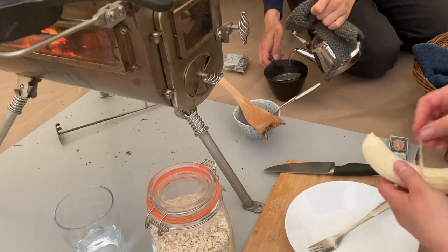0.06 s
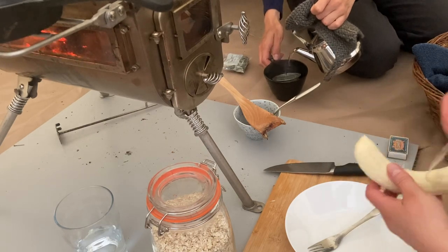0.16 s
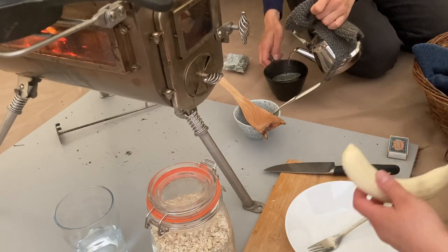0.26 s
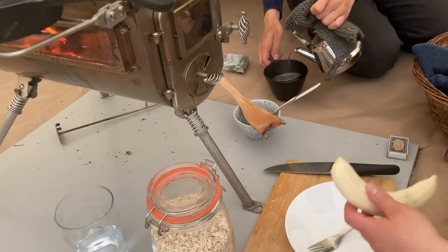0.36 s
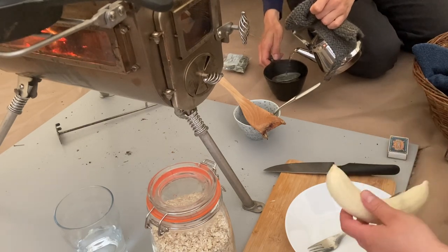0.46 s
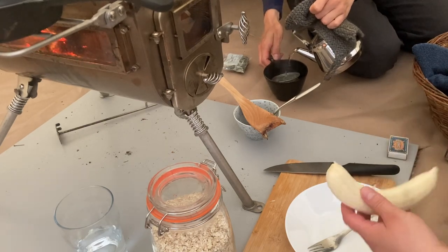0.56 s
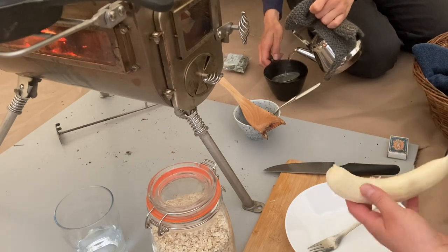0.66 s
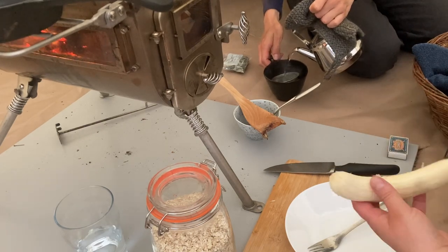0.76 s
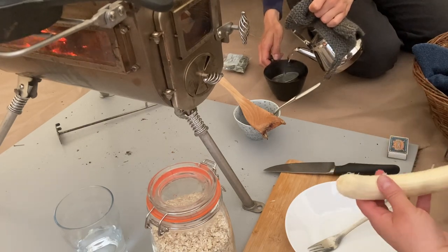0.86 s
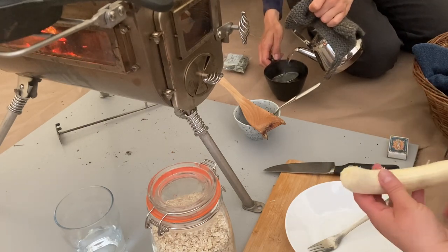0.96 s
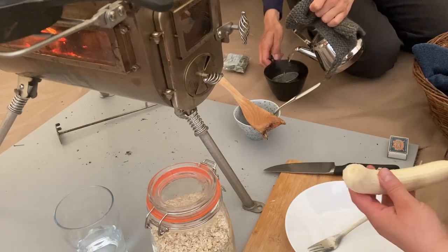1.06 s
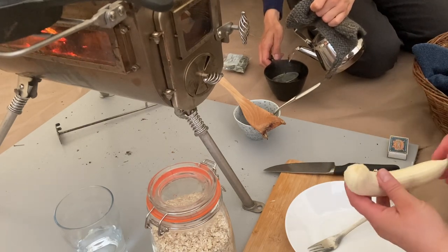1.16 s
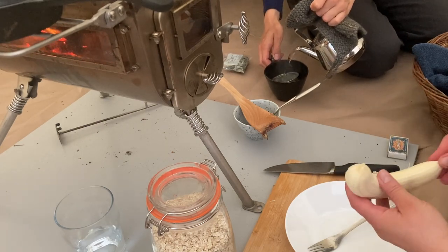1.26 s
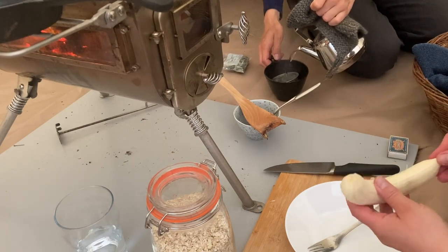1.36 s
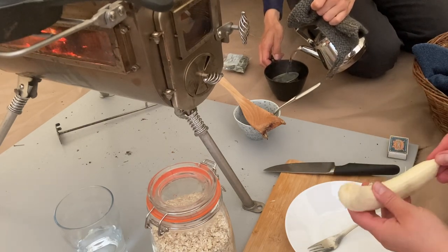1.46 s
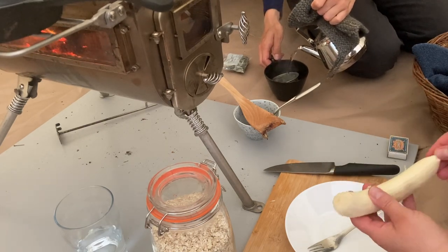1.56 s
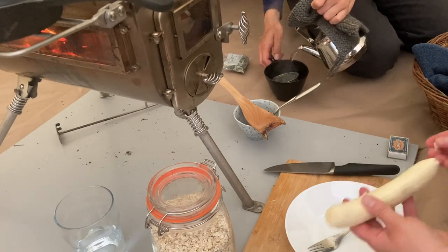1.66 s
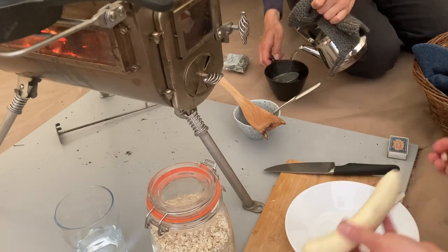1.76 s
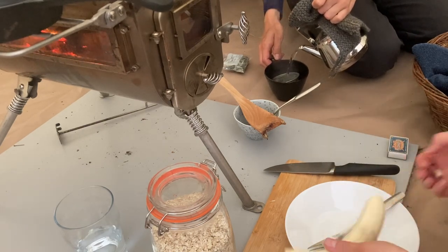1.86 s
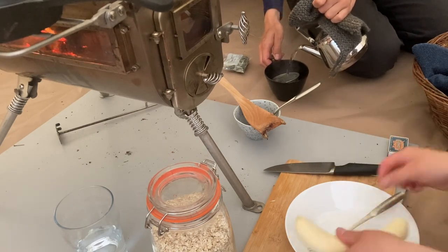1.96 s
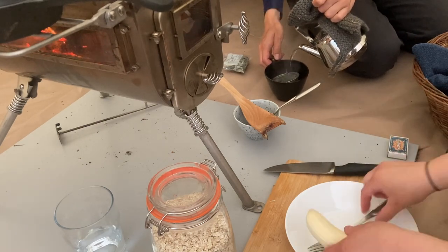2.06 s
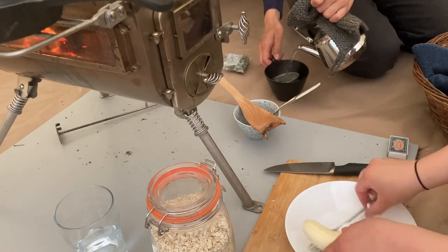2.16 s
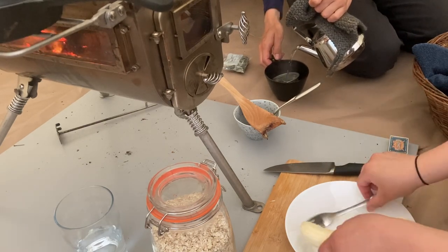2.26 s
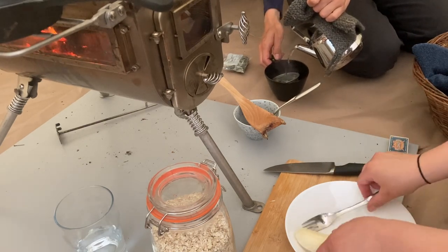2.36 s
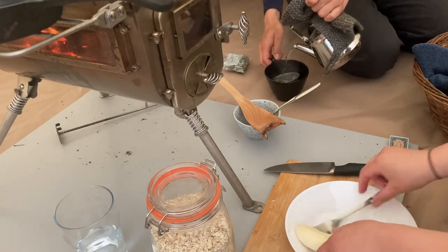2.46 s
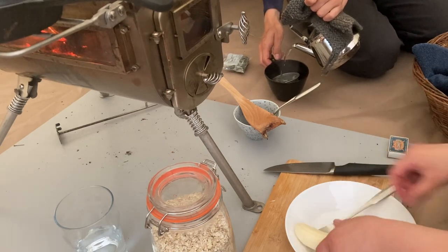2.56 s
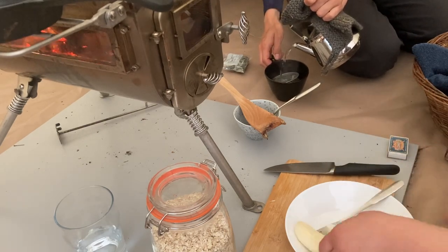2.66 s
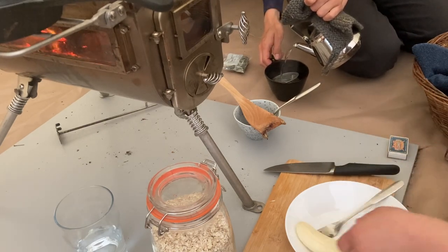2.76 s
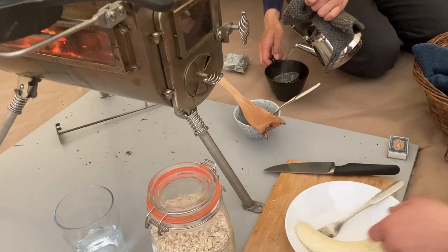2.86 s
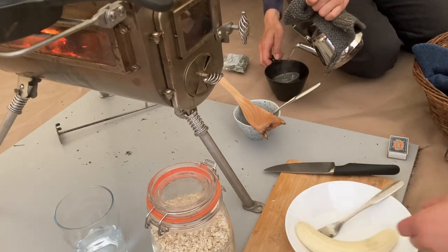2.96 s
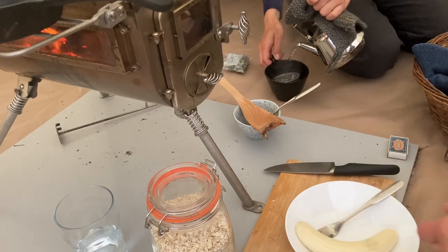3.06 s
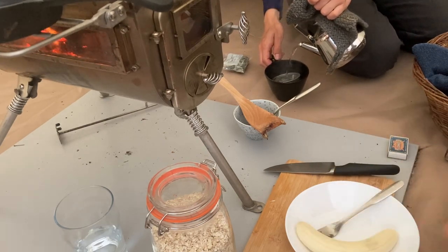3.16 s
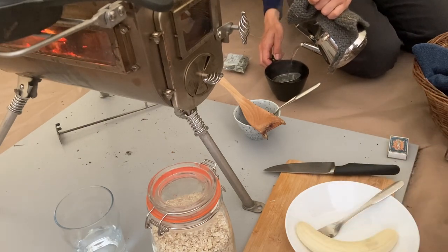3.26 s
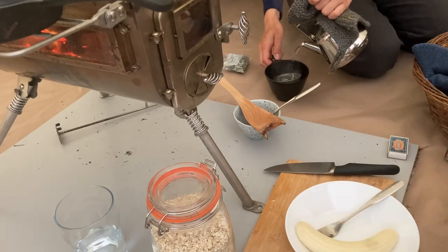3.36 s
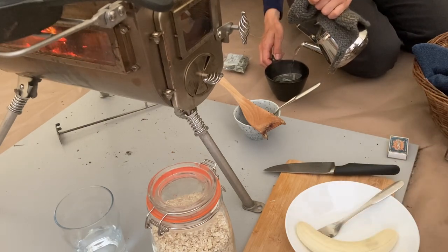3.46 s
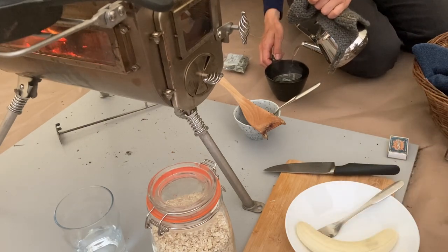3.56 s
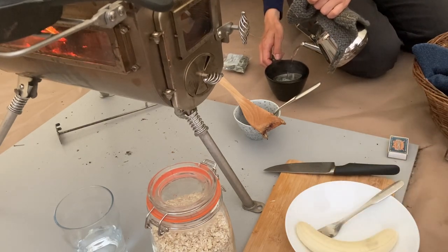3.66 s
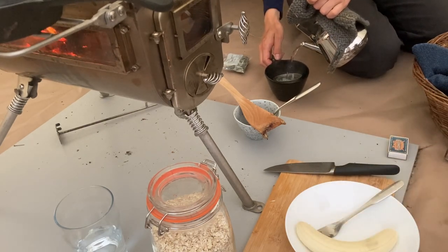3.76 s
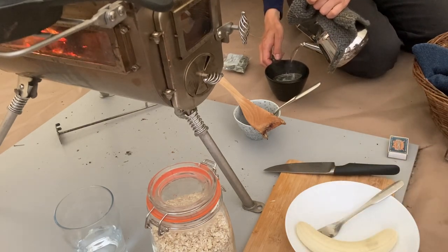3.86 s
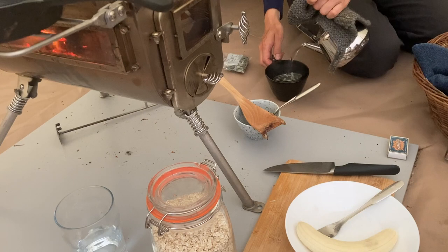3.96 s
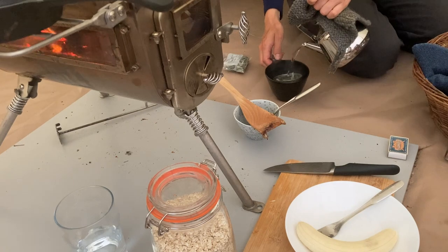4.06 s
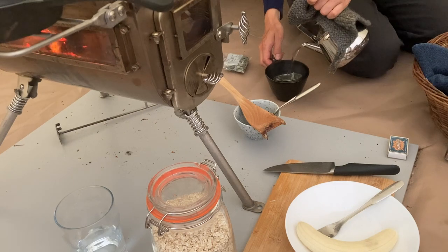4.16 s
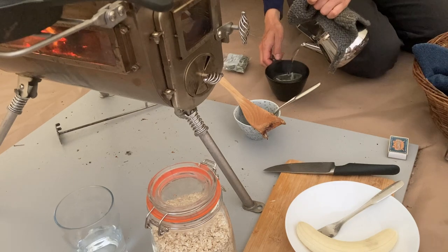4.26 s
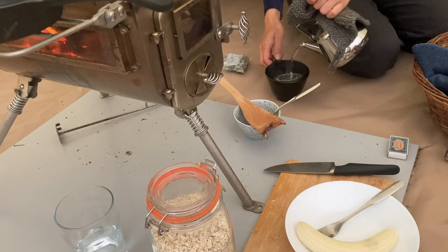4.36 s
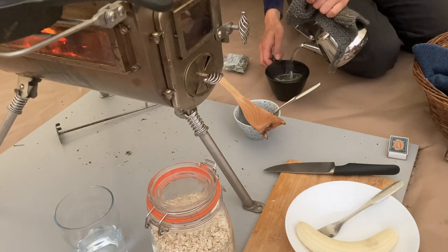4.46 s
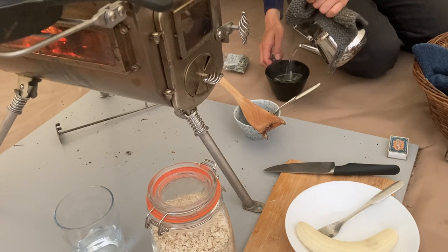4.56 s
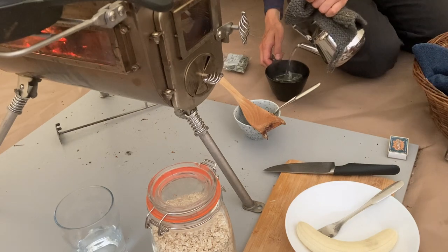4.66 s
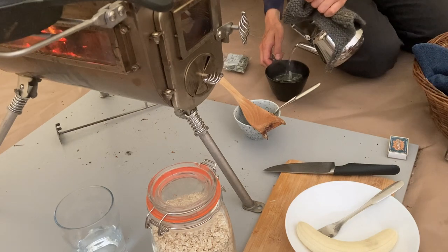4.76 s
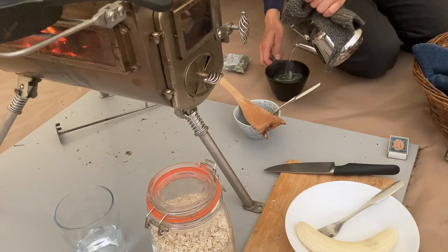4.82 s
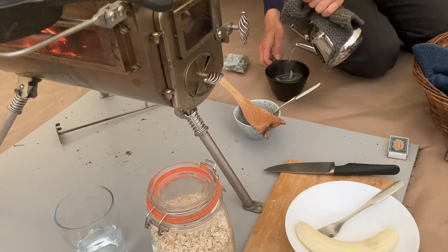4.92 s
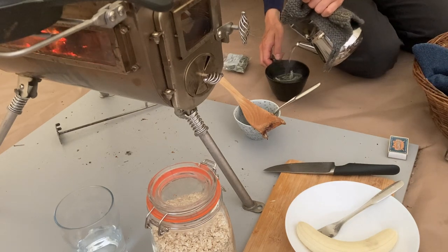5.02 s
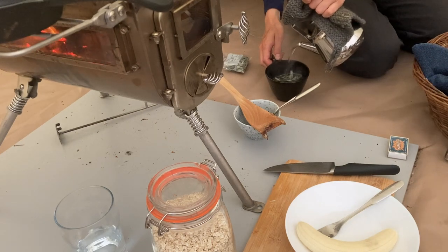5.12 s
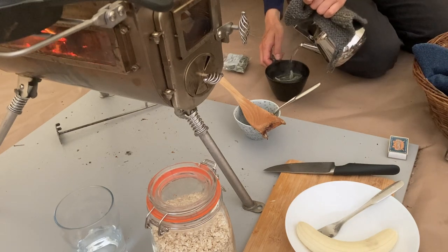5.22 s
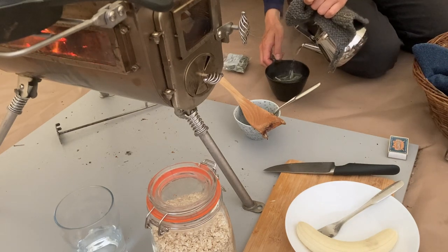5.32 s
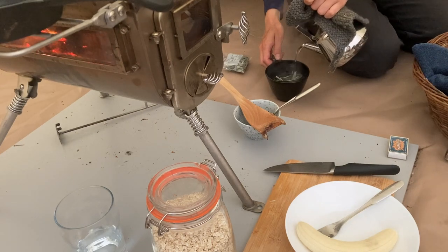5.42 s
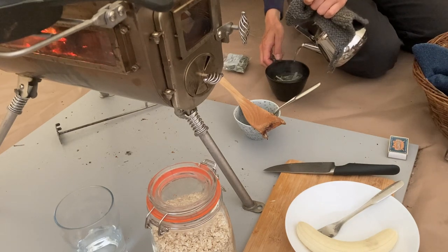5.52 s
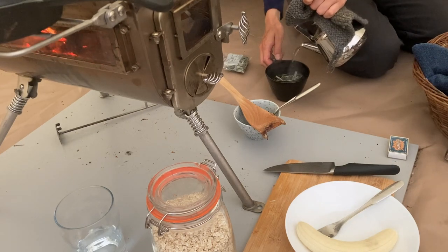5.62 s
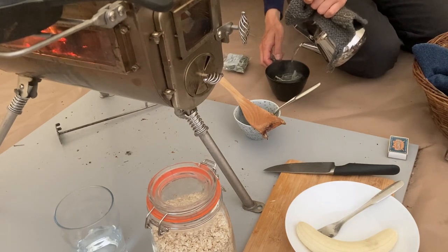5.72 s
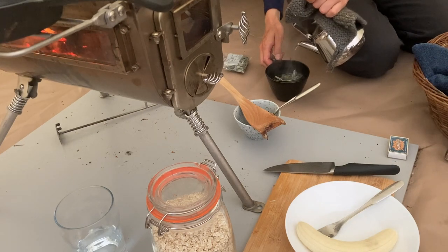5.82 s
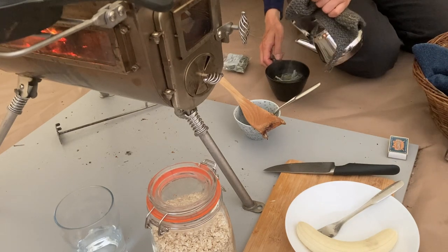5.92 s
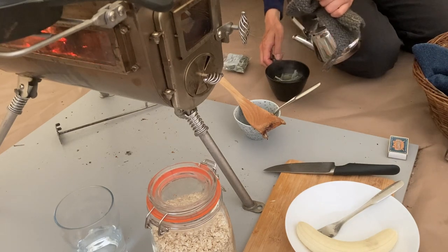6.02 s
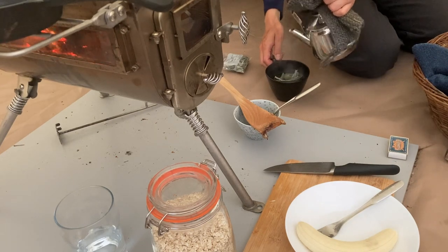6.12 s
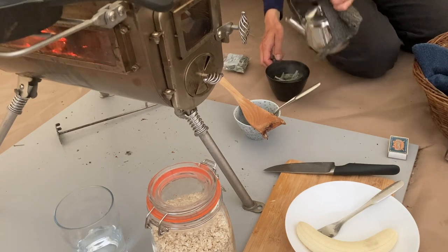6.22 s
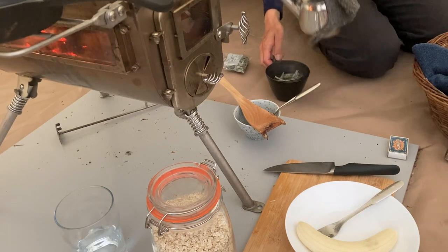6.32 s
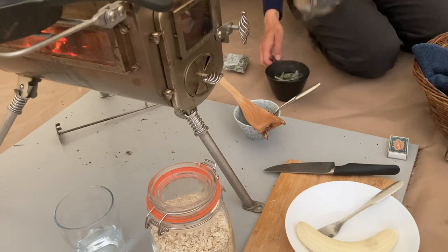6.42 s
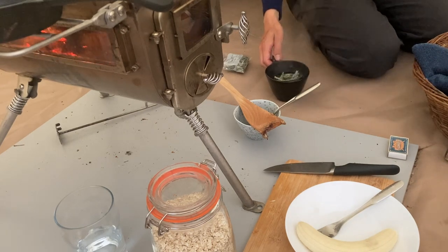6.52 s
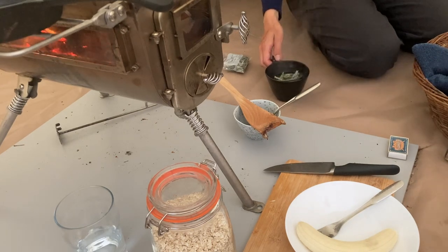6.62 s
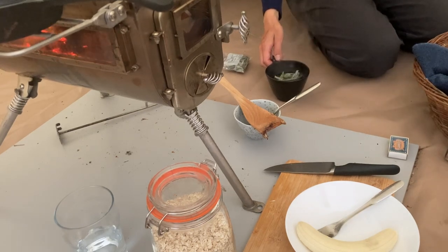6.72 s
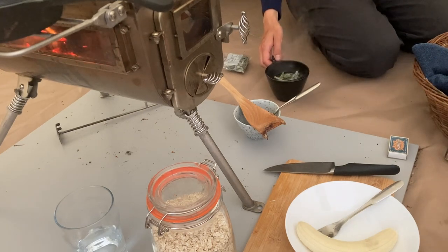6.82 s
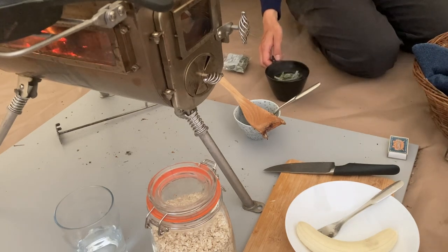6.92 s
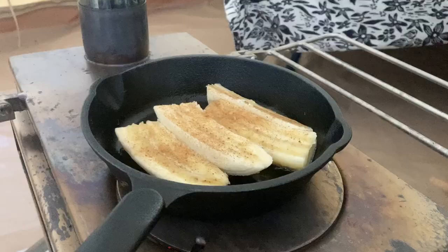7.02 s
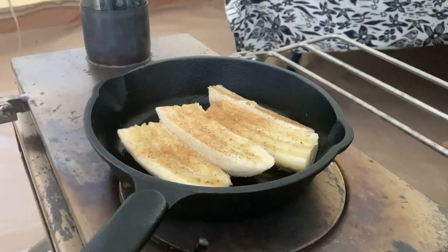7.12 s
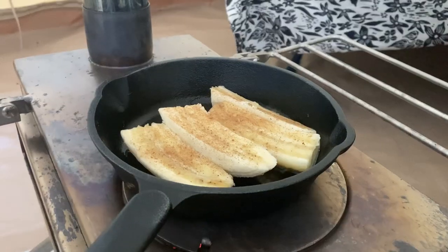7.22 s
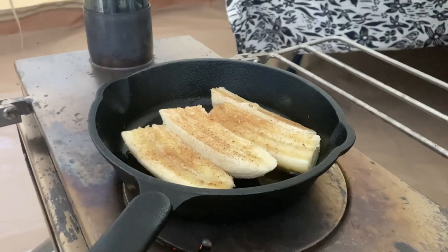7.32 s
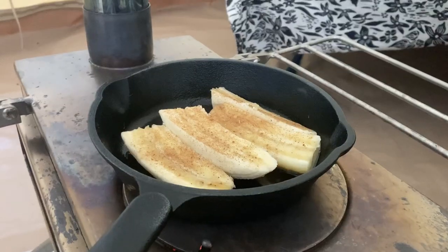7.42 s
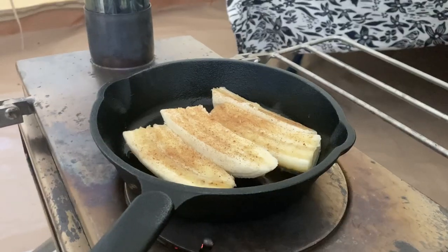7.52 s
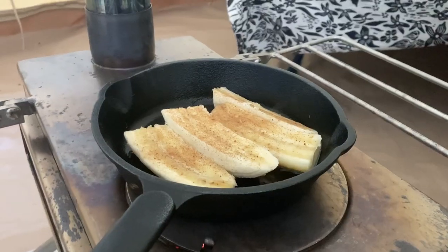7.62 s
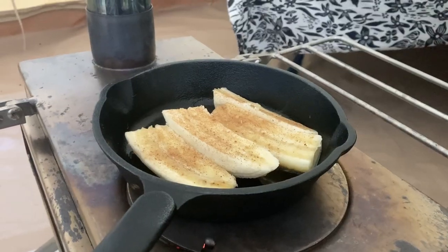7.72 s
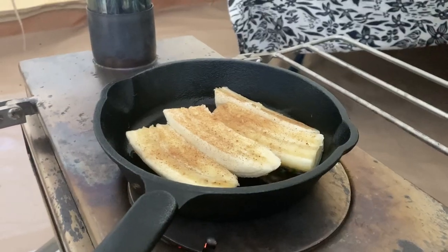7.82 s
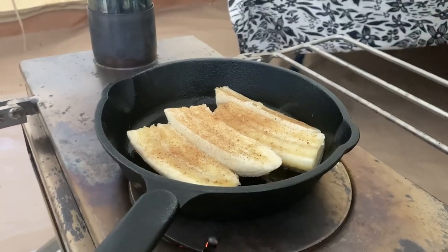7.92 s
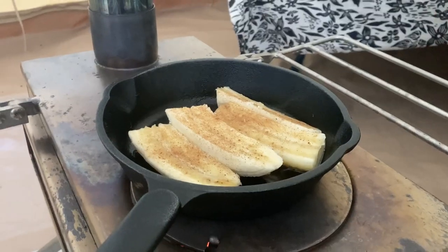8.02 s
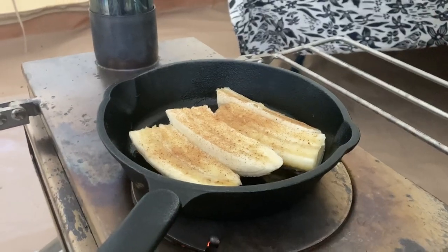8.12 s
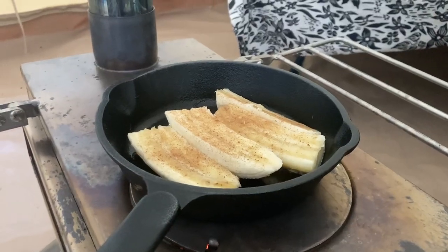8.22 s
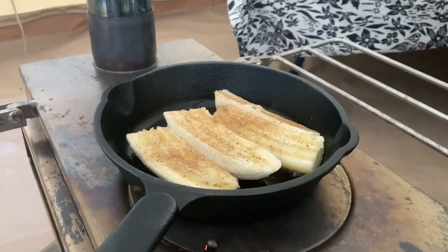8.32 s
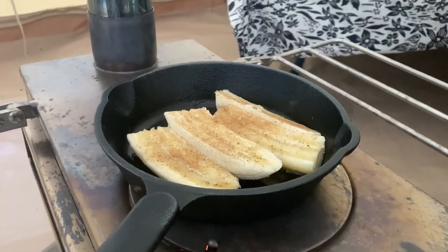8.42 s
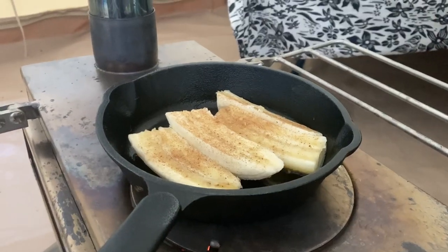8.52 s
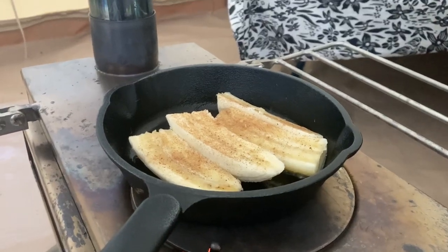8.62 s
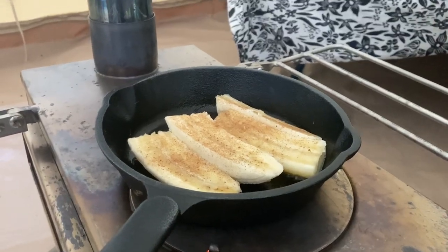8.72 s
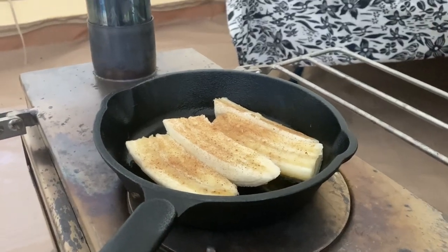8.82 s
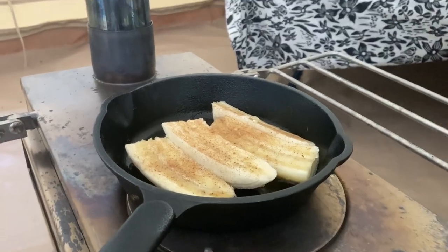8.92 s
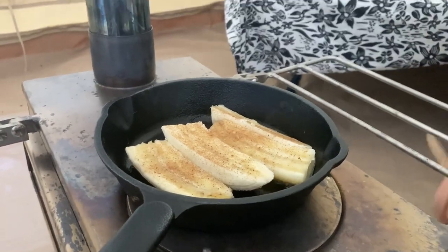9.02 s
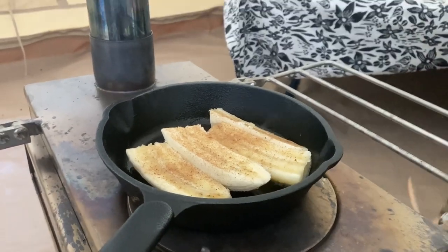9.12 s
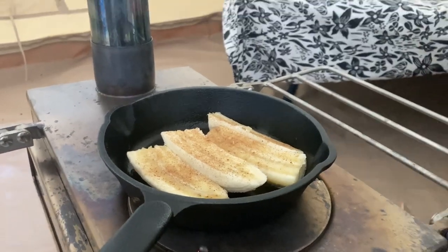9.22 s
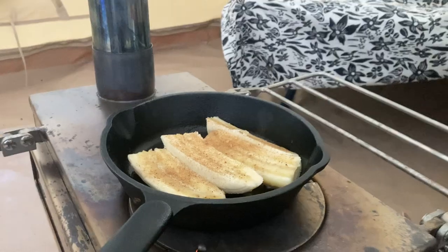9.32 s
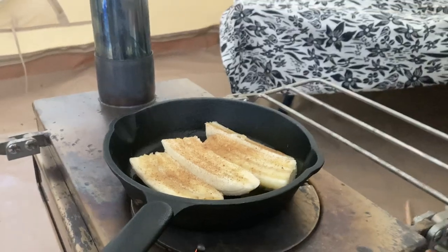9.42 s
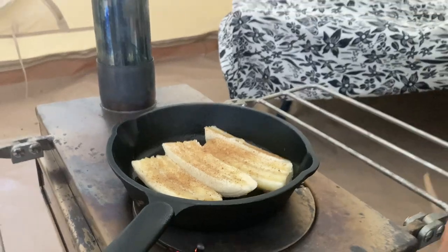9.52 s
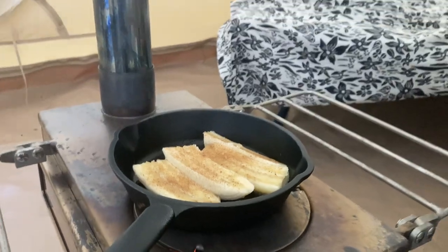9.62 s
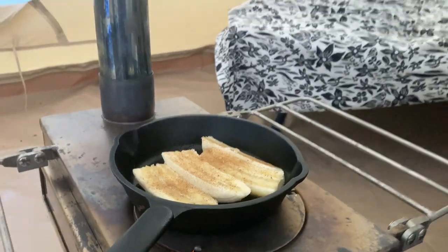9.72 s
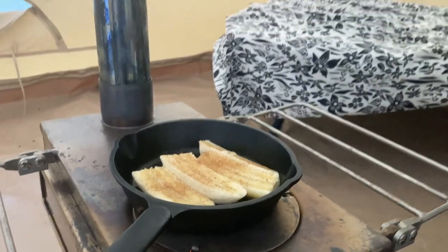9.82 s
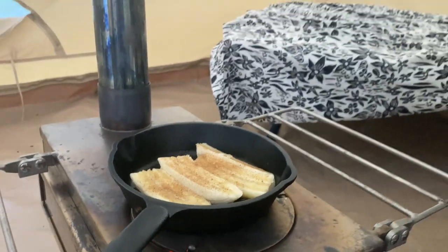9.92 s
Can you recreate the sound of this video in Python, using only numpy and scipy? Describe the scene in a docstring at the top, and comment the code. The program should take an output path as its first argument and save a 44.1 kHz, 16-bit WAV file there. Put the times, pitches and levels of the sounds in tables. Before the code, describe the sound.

A wood stove's draught rumbles very softly inside a tent, with a few faint ticks. From about 2.1 to 2.7 seconds a fork clatters onto a china plate in a quick run of bright, ringing hits, ending with a dull thud. Fingers rub softly, crockery clinks lightly at 3.4 seconds, and cloth rustles. Around 4.6 seconds a barely audible trickle of water runs into a mug. Near 5 seconds a hollow object is set down with a knock and briefly shoved over the ground sheet. Another rustle and a soft thud come around 6.5 seconds. At about 7 seconds the sound changes abruptly to bananas frying close by in a cast iron skillet, a louder, steady sizzle with sharp spits and pops. The hot stove pings twice around 7.5 seconds, steam sputters in little blurts until 8.5, and the sizzling continues to the end, around 10 seconds.

```python
"""Inside a tent, the draught of a wood stove rumbles softly under small ticks, rustling cloth and thuds.
A fork chatters down on a china plate, each impact exciting their modes; fingers rub, crockery clinks,
water trickles into a mug as ringing bubbles, and an object is set down and shoved over the ground sheet.
Then, from close by, bananas fry in a cast iron skillet: bursting bubbles make the fat fizz and spit,
the hot steel of the stove pings as it slips, and steam blurts out from under the slices."""
import sys
import numpy as np
from scipy import signal
from scipy.fft import rfft, irfft, next_fast_len
from scipy.io import wavfile

SR = 44100
rng = np.random.default_rng(int(sys.argv[2]) if len(sys.argv) > 2 else 0)


def store_wav(level_fs):
    """Save 16-bit WAV to argv[1]."""
    pcm = np.round(np.clip(np.atleast_2d(level_fs), -1, 1) * 32767)
    wavfile.write(sys.argv[1], SR, pcm.T.astype(np.int16))


N = 440118
T = np.arange(N) / SR
EVENT_T = T[:SR // 2]  # time axis of one short event [s]


def amp(db):
    """Amplitude ratio of a level in decibels."""
    return 10 ** (np.asarray(db) / 20)


def unit(x):
    """Normalisation to an rms of 1."""
    return x / np.sqrt(np.mean(x ** 2))


def add(out, start_s, x):
    """Superposition: x joins out from start_s on."""
    i = int(start_s * SR)
    out[..., i:i + x.shape[-1]] += x[..., :N - i]


def spectrum(points, size):
    """Gain of each FFT bin, interpolated in level over log frequency."""
    hz, db = np.transpose(points)
    return amp(np.interp(np.log(np.fft.rfftfreq(size, 1 / SR) + 1), np.log(hz), db))


def colour(x, points, size=4096):
    """Minimum-phase filtering: each row of x takes on a spectrum, through a response of unit energy."""
    cepstrum = irfft(np.log(spectrum(points, size)))
    cepstrum[1:size // 2] *= 2
    cepstrum[size // 2:] = 0
    response = irfft(np.exp(rfft(cepstrum)))
    response /= np.linalg.norm(response)
    return signal.oaconvolve(x, response[None], axes=1)[:, :x.shape[1]]


def resonate(x, peaks):
    """Resonance: a body reinforces narrow bands of x."""
    return x + sum(amp(db) * signal.lfilter(*signal.iirpeak(hz, hz / width, fs=SR), x)
                   for hz, width, db in peaks)


def scatter(x, decay_s, echo_db):
    """Early reflections: returns the direct sound with its echoes, and the echoes from the sides."""
    tail = rng.standard_normal((2, len(EVENT_T))) * np.exp(-EVENT_T / decay_s) * (EVENT_T > .001)
    tail /= np.linalg.norm(tail, axis=1, keepdims=True)
    front, side = signal.oaconvolve(x[None], tail, axes=1)[:, :N]
    return np.array([x + amp(echo_db) * front, side])


def wander(rate):
    """Random modulation with a spread near 1 and `rate` new values a second."""
    knots = rng.standard_normal(N // 100)
    return np.interp(T * rate, np.arange(len(knots)), knots)


def swell(decay_s):
    """Critically damped pulse: it peaks at 1 after decay_s and dies away."""
    return EVENT_T / decay_s * np.exp(1 - EVENT_T / decay_s)


def sweeps(rows, rest_db=-77.5):
    """Power sum of Gaussian envelopes: smooth movements over a faint resting level."""
    power = sum((amp(db) * np.exp(-((T - s) / half_s) ** 2)) ** 2 for s, half_s, db in rows)
    return np.sqrt(amp(rest_db) ** 2 + power)


def strokes(rows, attack_s, release_s):
    """Power sum of pushes, each with a linear attack, a hold and an exponential release."""
    power = 0
    for s, hold_s, db in rows:
        attack = np.clip((T - s) / attack_s, 0, 1)
        release = np.exp(-np.maximum(T - s - hold_s, 0) / release_s)
        power += (amp(db) * attack * release) ** 2
    return np.sqrt(power)


def band_noise(low_hz, high_hz):
    """Band-limited noise of rms 1 for one event."""
    band = signal.butter(2, [low_hz, high_hz], "band", fs=SR, output="sos")
    return unit(signal.sosfilt(band, rng.standard_normal(len(EVENT_T))))


def grains(rate, spread_db):
    """Shot noise: two independent streams of impulses of random size, `rate` a second."""
    size = amp(spread_db * np.minimum(rng.exponential(size=(2, N)), 6))
    occurs = rng.random((2, N)) < rate / SR
    return unit(occurs * size * rng.choice([-1, 1], (2, N)))


def bubbles(rate, spread_db, low_hz, high_hz, decay_s):
    """Bubble resonance: each of `rate` bubbles a second rings briefly at its own pitch."""
    out, t = np.zeros(N), T[:SR // 200]
    for when, size, pitch, length in rng.random((int(rate * N / SR), 4)):
        hz = low_hz * (high_hz / low_hz) ** (pitch ** 1.4)
        db = -spread_db * np.log(size + 0.015)
        envelope = swell(decay_s * (.5 + length))[:len(t)]
        add(out, when * T[-1], amp(db) * envelope * np.sin(2 * np.pi * hz * t))
    return unit(out)


def clicks(rows, points, decay_s, treble_hz=3000):
    """Broadband transients: tiny noise bursts, each with its own treble tilt."""
    out = np.zeros(N)
    for s, db, tilt_db in rows:
        tilted = [(hz, level + tilt_db * max(np.log2(hz / treble_hz), 0)) for hz, level in points]
        click = colour(rng.standard_normal((1, len(EVENT_T))) * swell(decay_s), tilted)[0]
        add(out, s, amp(db) * click / np.abs(click).max())
    return out


def chatter(hits, modes, contact, contact_db, bounce_hz, first_impulse, smear_s):
    """Modal excitation: a train of ever weaker impacts drives the damped modes of a body."""
    out, shape = np.zeros((2, N)), (2, len(EVENT_T))
    mode_hz, mode_db, _ = np.transpose(modes)
    for s, db, decay_s, tilt_db, favoured_hz in hits:
        bounces = rng.random(shape) < bounce_hz / SR
        force = bounces * rng.standard_normal(shape) * np.exp(-EVENT_T / decay_s)
        force[0, 0] = first_impulse
        force /= np.linalg.norm(force, axis=1, keepdims=True)
        octaves = np.log2(mode_hz / favoured_hz)
        spot_db = 6.5 * np.exp(-(octaves / .05) ** 2)  # each struck spot favours other modes
        gains = amp(mode_db + tilt_db * octaves + spot_db + rng.standard_normal(len(modes)))
        ring = 0
        for (hz, _, t60), gain in zip(modes, gains / np.linalg.norm(gains)):
            damping = np.log(1000) / t60
            pole = np.exp((2j * np.pi * hz - damping) / SR)
            mode = signal.lfilter([1, 0, -1], [1, -pole], force).imag
            mode /= np.linalg.norm(mode, axis=1, keepdims=True)
            ring += gain * mode * np.sqrt(SR / damping) / 2
        # each contact also cracks, smeared by the many short-lived modes
        smear = rng.standard_normal(shape) * np.exp(-EVENT_T / smear_s)
        crack = colour(signal.fftconvolve(force, smear, axes=1)[:, :len(EVENT_T)], contact)
        add(out, s, amp(db) * (ring + amp(contact_db) * crack))
    return out


def rebounds(rows, strike_s, wait_s, extra_tilt_db):
    """Double excitation: a short strike, then a longer, brighter rattle on the same spot."""
    hits = []
    for s, strike_db, rattle_db, rattle_s, tilt_db, favoured_hz in rows:
        hits.append((s, strike_db, strike_s, tilt_db, favoured_hz))
        hits.append((s + wait_s, rattle_db, rattle_s, tilt_db + extra_tilt_db, favoured_hz))
    return hits


def blow(cycles, decay_s):
    """Soft impact: a damped tone, its phase given in cycles, with a dull shudder."""
    shudder = band_noise(70, 380)
    return np.sqrt(swell(decay_s / 2)) * (np.sin(2 * np.pi * cycles) + shudder / 2)


# spectrum of the stove's draught (frequency [Hz], level [dB])
DRAUGHT_SPECTRUM = [(26, -28), (42, 3.5), (130, 0), (220, -9), (550, -7.5), (1800, -11.5), (4500, -21),
                    (7000, -37), (16000, -52)]


def draught():
    """Flow noise: air is drawn through the firebox, gently unsteady."""
    return colour(rng.standard_normal((2, N)), DRAUGHT_SPECTRUM) * amp(-61 + 0.58 * wander(7))


# ticks of things being handled (time [s], relative level [dB], treble tilt [dB/octave])
TICKS = [(.367, -55, 10), (.458, -57, 4), (1.105, -58, 6), (1.677, -48.5, 11), (4.933, -42, 4),
         (5.672, -49.5, -6.5), (5.805, -52.5, 4)]
# spectrum of a light, hard contact (frequency [Hz], level [dB])
TICK_SPECTRUM = [(150, -25), (1100, -3.5), (4500, -1.5), (9000, -2), (16000, -5.5)]


def ticks():
    """Impact noise: brief contacts radiate broadband clicks."""
    return amp(8) * scatter(clicks(TICKS, TICK_SPECTRUM, decay_s=.0012), decay_s=.009, echo_db=0)


# movements of an arm (centre time [s], half length [s], level [dB])
ARM_MOVES = [(1.65, 0.42, -74), (3.58, 0.049, -55), (3.97, 0.25, -60), (4.6, 0.7, -64.5),
             (6.08, 0.14, -63.5), (6.47, 0.098, -52), (6.9, 0.23, -63.5)]
# spectrum of the rustle (frequency [Hz], level [dB])
CLOTH_SPECTRUM = [(200, 3), (700, -3.5), (3500, -1.5), (6000, -4), (8500, -1.5), (11500, -1.5),
                  (16000, -13.5)]


def cloth():
    """Stick-slip friction: fibres catch and let go in fine grains that swell with each movement."""
    return colour(grains(rate=6600, spread_db=1), CLOTH_SPECTRUM) * sweeps(ARM_MOVES)


# dull thuds (time [s], level [dB], starting frequency [Hz], decay [s])
THUDS = [(1.43, -55, 219, 0.025), (2.668, -38, 206, 0.013), (4.326, -54.5, 227, 0.018),
         (5.673, -50, 513, 0.0057), (6.689, -42.5, 872, 0.025), (9.136, -36, 1000, 0.0056),
         (9.294, -52, 502, 0.016)]


def thuds():
    """Dispersion: the high frequencies of a soft blow arrive first, so its pitch falls."""
    out = np.zeros(N)
    fall_cycles = 5.42  # the pitch halves in this many periods of the starting frequency
    for s, db, hz, decay_s in THUDS:
        cycles = fall_cycles * np.log1p(hz * EVENT_T / fall_cycles)
        add(out, s, amp(db) * blow(cycles, decay_s))
    return scatter(out, decay_s=0.0074, echo_db=-33)


# blows of the fork (time [s], strike level [dB], rattle level [dB], rattle decay [s],
# tilt [dB/octave], favoured frequency [Hz])
FORK_HITS = [(2.143, -44.5, -53.5, 0.032, -3, 3313), (2.242, -36, -41, 0.023, 8.5, 3320),
             (2.296, -23, -15, 0.0076, -2.5, 5730), (2.345, -36.5, -25, 0.018, -2, 8130),
             (2.407, -24.5, -23, .02, -1, 4380), (2.4445, -12, -13, 0.02, -1, 6750),
             (2.476, -23, -16, 0.024, -3, 4320), (2.69, -25, -23.5, 0.012, -1.5, 8400)]
# joint modes of fork and plate (frequency [Hz], level [dB], T60 [s])
PLATE_MODES = [(520, -13, 0.076), (1070, -18.5, 0.17), (1844, -19, 0.22), (2120, -16, .15),
               (3330, -8.5, 0.27), (4295, -8.5, 0.1), (4370, -8, .12), (5520, -3, .11), (6750, -10, 0.14),
               (6950, -5.5, .13), (7900, -12.5, .15), (8120, -4, .1), (8295, -4.5, 0.1),
               (9850, -0.5, 0.1207), (10880, -9.5, .11), (11290, -7.5, .09), (11270, -2, 0.18),
               (12600, -6, .12), (13086, -6, .12), (14900, -9, 0.13)]
# spectrum of steel meeting china (frequency [Hz], level [dB])
CONTACT_SPECTRUM = [(40, -23), (150, -5), (800, -11), (2000, 3), (12000, -2), (16000, -13)]


def fork():
    """Inelastic rebound: the fork strikes the plate and rattles on, and both ring in their modes."""
    hits = rebounds(FORK_HITS, strike_s=0.005, wait_s=.013, extra_tilt_db=3)
    return chatter(hits, PLATE_MODES, CONTACT_SPECTRUM,
                   contact_db=-9, bounce_hz=1300, first_impulse=1.1, smear_s=0.023)


# strokes of the fingers (time [s], length [s], level [dB])
RUBS = [(2.822, 0.024, -52), (2.87, 0.12, -57), (3.43, 0.12, -60.5)]
# spectrum of the rubbing (frequency [Hz], level [dB])
RUB_SPECTRUM = [(80, -15), (250, 3.5), (800, -8), (1250, -4.5), (6000, -26.5)]


def fingers():
    """Stick-slip friction: skin catches on plate and board in sparse, dull grains."""
    friction = colour(grains(rate=700, spread_db=-4), RUB_SPECTRUM)
    return friction * strokes(RUBS, attack_s=.01, release_s=0.06)


# a light clink (time [s], level [dB], bounce decay [s], tilt [dB/octave], favoured frequency [Hz])
CLINKS = [(3.44, -49, 0.0049, -0.5, 3890)]
# modes of the crockery (frequency [Hz], level [dB], T60 [s])
CROCKERY_MODES = [(1110, -2, 0.15), (2205, -3, 0.11), (3890, -7, 0.078)]


def clink():
    """Free vibration: lightly struck crockery rings at its natural frequencies."""
    return chatter(CLINKS, CROCKERY_MODES, TICK_SPECTRUM,
                   contact_db=-4.5, bounce_hz=800, first_impulse=1.5, smear_s=.005)


# swell of a thin stream from the kettle (centre time [s], half length [s], level [dB])
STREAM = [(4.6, 0.16, -68.5)]


def pour():
    """Air entrainment: the stream drags small, ringing bubbles into the mug."""
    trickle = bubbles(rate=750, spread_db=2.5, low_hz=1500, high_hz=4945, decay_s=0.00061)
    return scatter(trickle, decay_s=.006, echo_db=-2) * sweeps(STREAM)


# jerks of an object over the ground sheet (time [s], length [s], level [dB])
SHOVES = [(4.924, 0.01, -39.5), (4.982, 0.026, -39.5), (5.031, 0.055, -38.5), (5.125, 0.016, -51.5),
          (5.235, 0.025, -57.5)]
# spectrum of the scraping (frequency [Hz], level [dB])
SHOVE_SPECTRUM = [(50, -5.5), (520, -1), (850, -8), (2200, -3.5), (4500, -9.5), (16000, -17.5)]
# hollow of the object (frequency [Hz], bandwidth [Hz], gain [dB])
OBJECT_RESONANCES = [(495, 41, -4), (1290, 90, -1), (1820, 60, 1), (2860, 69, -1)]


def shove():
    """Forced vibration: uneven sliding friction drives the resonances of a hollow object."""
    friction = colour(grains(rate=2500, spread_db=0), SHOVE_SPECTRUM)
    jerks = strokes(SHOVES, attack_s=0.0098, release_s=0.052) * amp(0.79 * wander(70))
    return resonate(friction * jerks, OBJECT_RESONANCES)


def knock(time_s=4.931, db=-37, hz=497):
    """Cavity resonance: the hollow object sounds one steady pitch as it is set down."""
    out = np.zeros(N)
    add(out, time_s, amp(db) * blow(hz * EVENT_T, decay_s=.011))
    return scatter(out, decay_s=0.0074, echo_db=-33)


# spectrum of the fizzing fat (frequency [Hz], level [dB])
FIZZ_SPECTRUM = [(40, -28), (400, -6.5), (900, -5), (1600, 1), (2700, -4), (5700, 1.5), (15600, 2.5)]
# hollow of the skillet (frequency [Hz], bandwidth [Hz], gain [dB])
SKILLET_RESONANCES = [(1190, 160, 2), (2286, 53, 8.5), (3460, 520, 5)]


def sizzle():
    """Shot noise: countless tiny bursting bubbles sound the pan; larger ones crackle in flurries."""
    bursts = colour(grains(rate=9000, spread_db=3.2), FIZZ_SPECTRUM) * amp(1.2 * wander(40))
    fizz = resonate(bursts, SKILLET_RESONANCES)
    flurry = amp(3.4 * wander(130))
    small = bubbles(rate=520, spread_db=4, low_hz=6380, high_hz=15300, decay_s=0.00012)
    large = bubbles(rate=260, spread_db=2.6, low_hz=1600, high_hz=6000, decay_s=0.00016)
    crackle = scatter(amp(-5) * small + amp(-16) * large, decay_s=0.0022, echo_db=-7.5) * flurry
    return amp(-36.5) * (amp(-1.5) * fizz + crackle)


# loud spits of fat (time [s], relative snap level [dB], relative pop level [dB])
SPITS = [(7.1171, -12, -25), (7.445, -8.5, -34), (7.5597, -12, -25), (7.6804, -15, -19.5),
         (7.9312, -8.5, -20), (8.2378, -10, -20.5), (8.2592, -12, -24), (8.3467, -14.5, -32),
         (8.412, -5, -24), (8.414, -4.5, -20), (8.4747, -13, -21), (8.538, -19, -23), (8.5618, -13, -36),
         (8.7193, -16, -34), (8.926, -7, -31), (8.9852, -13, -27), (9.1703, -21, -21.5),
         (9.4775, -15.5, -34), (9.8524, -13, -44), (9.8968, -18, -24)]
# spectra of the high snap and the lower pop (frequency [Hz], level [dB])
SNAP_SPECTRUM = [(200, -34), (5000, -19.5), (6800, 4), (12000, -4.5), (16000, -7)]
POP_SPECTRUM = [(200, -29), (1200, -0.5), (5500, -1), (16000, -29)]


def spits():
    """Pressure transients: the largest bubbles burst with a snap and a pop, harder snaps being brighter."""
    snap_rows = [(s, db, min(db + 17, 6)) for s, db, _ in SPITS]
    snaps = clicks(snap_rows, SNAP_SPECTRUM, decay_s=0.0002)
    pops = clicks([(s, db, 0) for s, _, db in SPITS], POP_SPECTRUM, decay_s=0.00046)
    return amp(1.5) * scatter(snaps + pops, decay_s=0.0078, echo_db=-12)


# slips of the hot steel (time [s], ping level [dB], chirp level [dB], chirp decay [s],
# tilt [dB/octave], favoured frequency [Hz])
PINGS = [(7.3445, -23, -23, .018, 3, 2490), (7.5945, -18.5, -14, 0.0093, 9, 5110)]
# modes of the stove (frequency [Hz], level [dB], T60 [s])
STOVE_MODES = [(1090, 7.5, 0.058), (1141, 5.5, 0.15), (2456, 2, 0.046), (2686, -6, 0.15),
               (5120, -4.5, 0.076)]


def stove_pings():
    """Stick-slip excitation: the hot stove pings in its modes, then chirps as the steel slips."""
    hits = rebounds(PINGS, strike_s=0.0035, wait_s=.008, extra_tilt_db=4.5)
    return chatter(hits, STOVE_MODES, TICK_SPECTRUM,
                   contact_db=-13.5, bounce_hz=840, first_impulse=0.69, smear_s=0.0077)


# steam escaping from under the slices (time [s], level [dB], frequency [Hz])
BLURTS = [(7.642, -31, 995), (7.745, -35, 693), (7.801, -35, 830), (7.9308, -22.5, 680),
          (8.207, -35.5, 770), (8.272, -29, 740), (8.288, -29, 710), (8.416, -31, 730), (8.48, -31, 1190)]


def steam():
    """Damped oscillation: a pocket of steam rings for a few cycles, then sputters out."""
    out = np.zeros(N)
    for s, db, hz in BLURTS:
        decay_s = 1.9 / hz  # the tone is loudest after 1.9 cycles
        tone = swell(decay_s) * np.sin(2 * np.pi * hz * EVENT_T)
        sputter = swell(decay_s * 3.2) * band_noise(hz * 0.73, hz * 1.53)
        add(out, s, amp(db) * (tone + amp(-9) * sputter))
    return scatter(out, decay_s=0.0019, echo_db=-13)


def stereo(pair, width):
    """Mid-side stereophony: a direct and a lateral signal become left and right at constant power."""
    size = next_fast_len(N)
    side_gain = spectrum(width, size)
    gains = np.array([np.ones_like(side_gain), side_gain]) / np.hypot(1, side_gain)
    mid, side = irfft(rfft(pair, size) * gains, size)[:, :N]
    return np.array([mid + side, mid - side])


# lateral sound in the tent and at the skillet (frequency [Hz], side minus mid level [dB])
TENT_WIDTH = [(100, -13.5), (500, -6.5), (1200, 0.5), (5500, -0.5), (7200, -17.5)]
SKILLET_WIDTH = [(300, -11.5), (700, -8), (2400, 2.5), (5700, 3.5), (7200, -31)]


def scene():
    """Superposition: the quiet corner by the stove fades out, then the skillet is heard from close by."""
    fry_start_s = 7.056
    before = np.clip((fry_start_s - T) / 0.053, 0, 1)
    frying = np.clip((T - fry_start_s) / .025, 0, 1)
    rumble = draught() * (before + amp(-5) * frying)
    handling = ticks() + cloth() + fork() + fingers() + clink() + pour() + shove() + knock()
    corner = rumble + handling * before + thuds()
    skillet = (sizzle() + spits()) * frying + stove_pings() + steam()
    return stereo(corner, TENT_WIDTH) + stereo(skillet, SKILLET_WIDTH)


def record(dry):
    """Group delay and band limiting: left lags right in the high treble, and the very top is cut."""
    lag_s, above_hz, top_hz = .000228, 7000, 16000
    size = next_fast_len(N)
    phase = np.pi * lag_s * np.maximum(np.fft.rfftfreq(size, 1 / SR) - above_hz, 0)
    delayed = irfft(rfft(dry, size) * np.exp(1j * np.array([-phase, phase])), size)[:, :N]
    lowpass = signal.ellip(8, .2, 70, top_hz, fs=SR, output="sos")
    return signal.sosfilt(lowpass, delayed)


dry = scene()
out = record(dry)
store_wav(out)
```